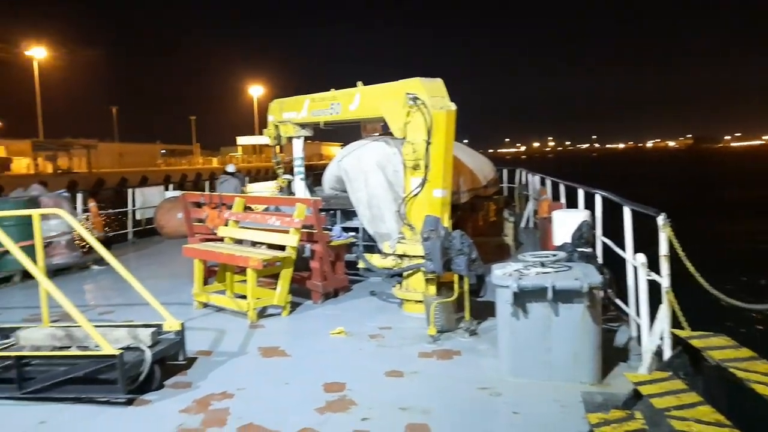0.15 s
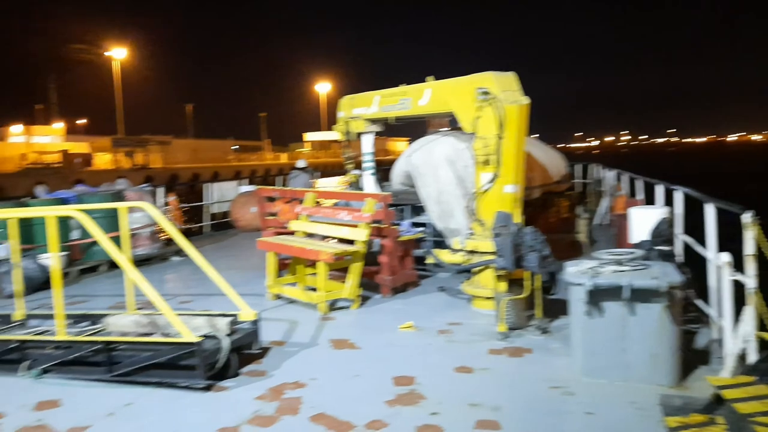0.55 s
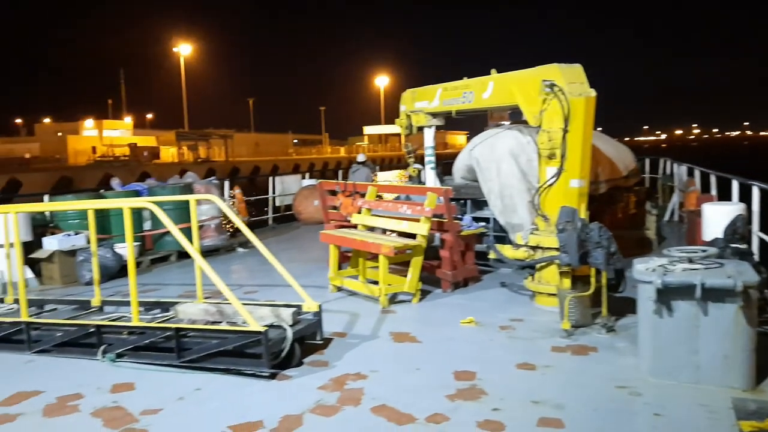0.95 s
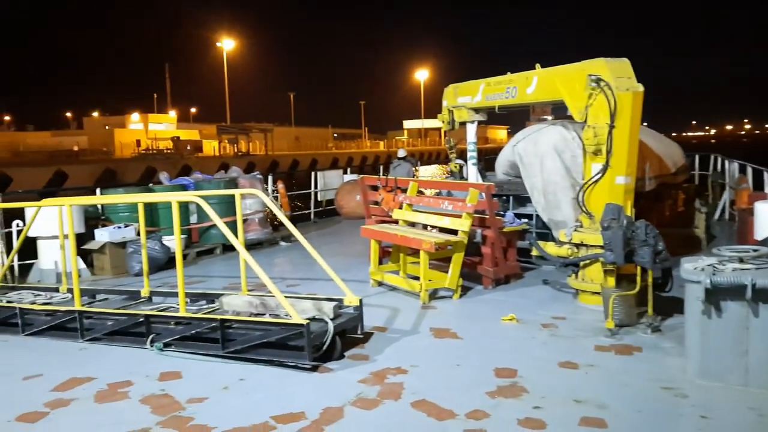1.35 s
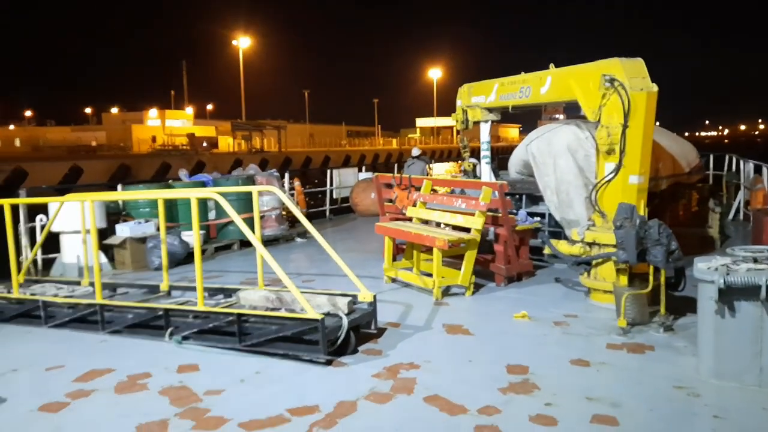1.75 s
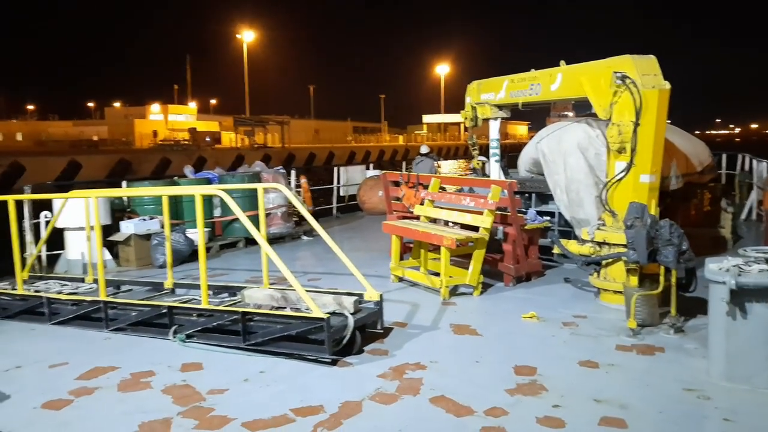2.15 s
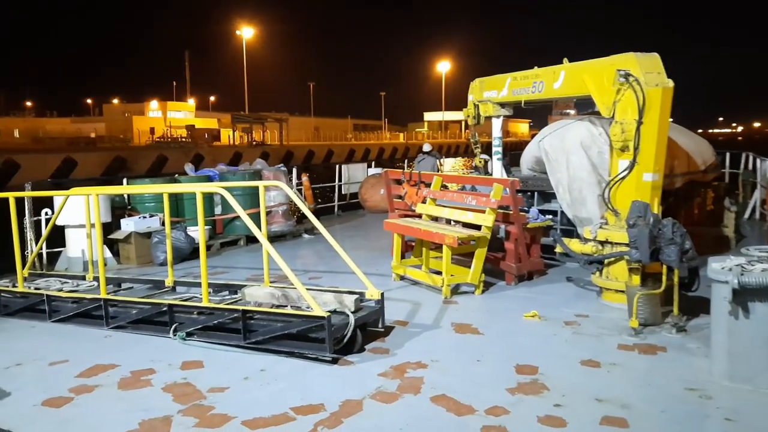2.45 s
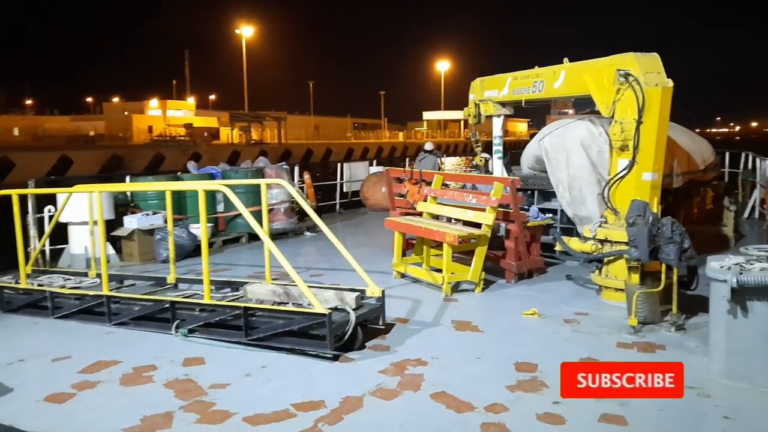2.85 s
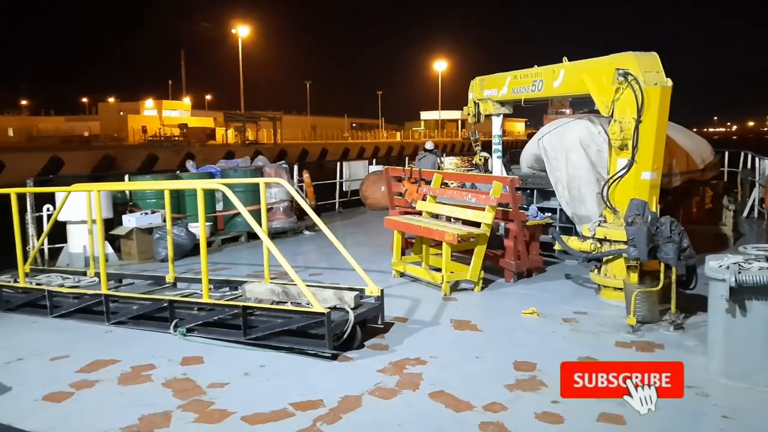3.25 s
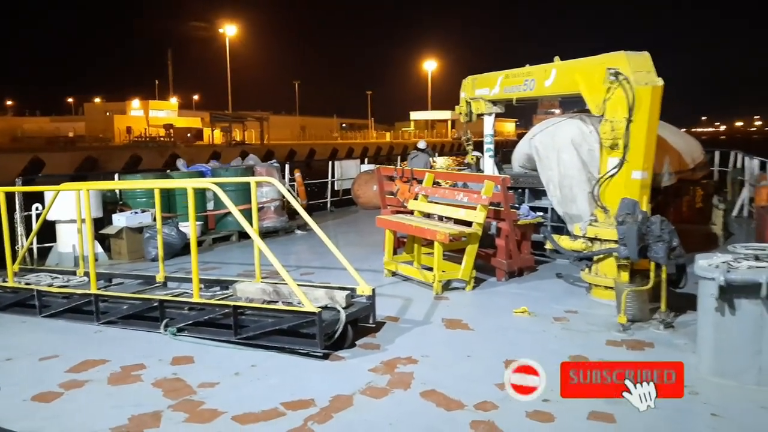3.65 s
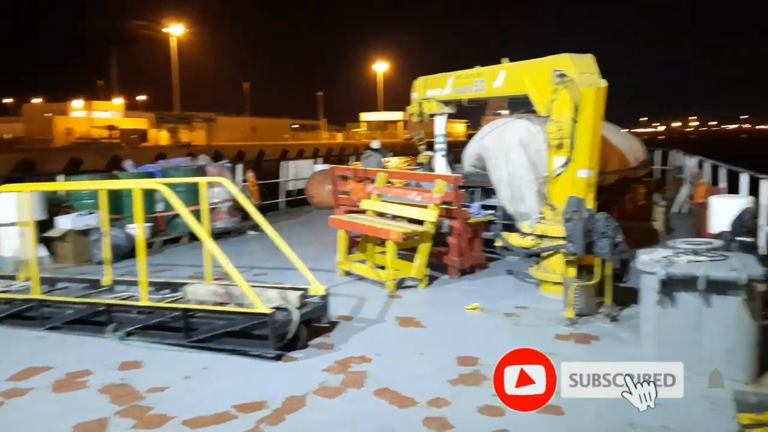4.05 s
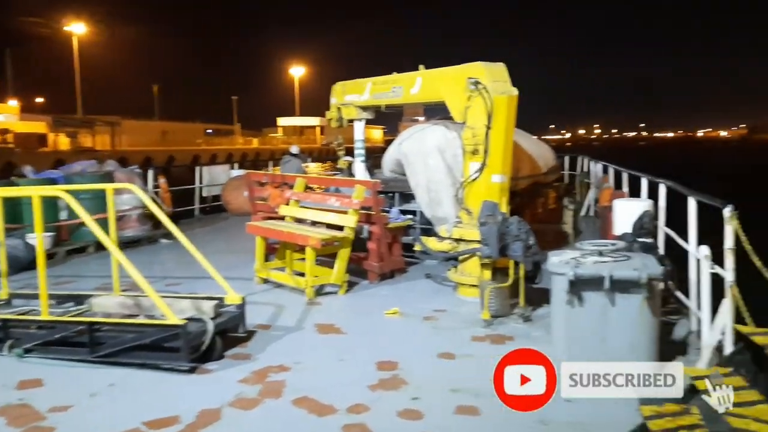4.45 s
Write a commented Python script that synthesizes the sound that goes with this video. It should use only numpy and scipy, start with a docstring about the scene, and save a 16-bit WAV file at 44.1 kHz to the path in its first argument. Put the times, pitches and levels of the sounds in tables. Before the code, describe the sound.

A dense, steady machinery drone runs from 0 to about 4.6 s on an open steel deck. Two diesels give a low throbbing hum near 90 Hz, beating about one and a half times a second, with a steady mid-low gear tone and faint clattering valve gear. A fan adds a rough, wavering low hum and weak high whine. Hull rumble, duct roar and softer louvre hiss fill the rest, with faint steel-like surges about three times a second. The first 0.13 s has extra bright hiss, which drops out abruptly. Low, short thuds fall at 0.5 s and, softer, 1.0 s; dull metal knocks come at 0.6, 1.3 and as a quick pair at 2.0 s. Loose slats flutter more from 1.3 s, easing near 4.2 s. A thin whistle swells around 2.9 s, mainly left. The stereo microphone hears centred bass and wide, diffuse treble.

```python
"""Ship's machinery under an open steel deck at night. Throughout: two diesels (beating sines, looped-noise
clatter), a six-bladed fan with motor whine (sines), and draught in hull, ducts, cowl and louvres (shaped noise).
To 0.13 s the treble is brighter; thuds at 0.5 and 1.0 s and knocks from 0.6 to 2.1 s are damped sines.
From 1.3 s loose slats flutter more strongly (noise band), easing near 4.2 s; a thin whistle swells at 2.9 s.
Two spaced ports hear the noise mostly alike in the bass, out of step in the middle, nearly unrelated on top."""
import sys
import numpy as np
from scipy import signal
from scipy.fft import rfft, irfft, next_fast_len
from scipy.io import wavfile
from scipy.ndimage import uniform_filter1d, map_coordinates

SR = 44100
rng = np.random.default_rng(int(sys.argv[2]) if len(sys.argv) > 2 else 0)


def dump(signal):
    """Clip the signal to [-1, 1] and save it as 16-bit WAV at the path in sys.argv[1]."""
    limited = np.clip(np.atleast_2d(signal).T, -1, 1)
    pcm = np.round(limited * 32767).astype(np.int16)
    wavfile.write(sys.argv[1], SR, pcm)


def gain_from_db(level_db):
    """Convert decibel levels to linear amplitude factors (20 dB per decade)."""
    decades = np.asarray(level_db, float) / 20
    return 10 ** decades


N = 203036  # samples
DIESEL_HZ, FAN_HZ = 14.8547, 29.62  # shaft turns a second


def unit(x):
    """Scaled to rms 1."""
    return x / np.sqrt(np.mean(x ** 2) + 1e-20)


def along(points, hz):
    """Each column after f/Hz, interpolated on a log axis."""
    f, *columns = np.transpose(points)
    return np.squeeze([np.interp(np.log(hz + 1), np.log(f + 1), c) for c in columns])


def curves(rows):
    """One value per sample for each column after t/s."""
    s, *columns = np.transpose(rows)
    return [np.interp(np.arange(N) / SR, s, c) for c in columns]


def wobble(knots_hz):
    """Smooth random curve."""
    knots = rng.standard_normal(int(N * knots_hz / SR) + 4)
    return map_coordinates(knots, [np.arange(N) * knots_hz / SR])


def bump(middle_s, half_s):
    """Bell-shaped swell of height 1."""
    return np.exp(-((np.arange(N) / SR - middle_s) / half_s) ** 2)


def patchy(depth_db):
    """Two unrelated noises under one field of random swells in time and pitch."""
    z = signal.stft(rng.standard_normal((2, N)), nperseg=512)[2]
    field = rng.standard_normal(z.shape[1:])
    field = uniform_filter1d(field, size=5, axis=0)
    field = uniform_filter1d(field, size=7, axis=1)
    return signal.istft(z * gain_from_db(depth_db * unit(field)), nperseg=512)[1][:, :N]


# microphone ports: f/Hz, likeness/0-1, left lead/rad, left-right/dB
PORTS = [(30, .4, 0, -.5), (90, .68, .05, -.5), (180, .75, .1, .8), (350, .73, .2, 1), (500, .78, .25, 1),
         (900, .5, .3, 1), (1250, .1, .4, 0), (1300, .1, 3, 0), (1500, .5, 3, .5), (2200, .45, 3.2, 0),
         (2400, .5, 5, -.5), (2800, .45, 5.2, .5), (3100, .15, 5, .5), (3400, .35, 4.9, 0),
         (4000, .4, 6.2, -.5), (4200, .2, 7.2, -.5), (5000, .2, 9.2, -1), (6200, .08, 12.6, -1),
         (8100, .1, 12.6, -1), (8600, .1, 12.6, -5), (10000, .15, 12.6, -3.2)]


def heard(pair, gain):
    """Colours two unrelated signals and mixes them to the ports' likeness, lag and balance; rms 1."""
    m = next_fast_len(N + 8192)
    hz = np.fft.rfftfreq(m, 1 / SR)
    alike, lead_rad, tilt_db = along(PORTS, hz)
    turn = np.arccos(np.clip(alike, 0, 1)) / 2
    shared, own = rfft(pair, m) * gain(hz) * [np.cos(turn), np.sin(turn)]
    half = gain_from_db(tilt_db / 2) * np.exp(.5j * lead_rad)
    ports = [(shared + own) * half, (shared - own) / half]
    return unit(irfft(ports, m)[:, :N])


def coloured(spectrum, depth_db):
    """Patchy noise with the relative spectral density of a table, at the ports."""
    return heard(patchy(depth_db), lambda hz: gain_from_db(along(spectrum, hz)))


BEAT_HZ, BEAT_PEAK_S = 1.517, 1.88  # a second engine fires this much lower; in step at this time


def tones(rows, base_hz, drift, waver_db, twin=0):
    """Sines on multiples of one slightly drifting shaft; each wavers in level. twin: second engine's share."""
    turns = np.cumsum(base_hz * (1 + drift * wobble(2.01))) / SR
    slip = 2 * np.pi * BEAT_HZ * (np.arange(N) / SR - BEAT_PEAK_S)  # the twin falls behind
    out = np.zeros((2, N))
    side = np.array([[.5], [-.5]])
    for multiple, db, tilt_db, lead_rad in rows:
        phase = 2 * np.pi * (multiple * turns + rng.random()) + lead_rad * side
        wave = np.sin(phase) + twin * np.sin(phase - slip)
        level_db = db + tilt_db * side + waver_db * wobble(11)
        out += np.sqrt(2) * gain_from_db(level_db) * wave
    return out


# firing tone before its throb: multiple of shaft, level/dB, left-right/dB, left lead/rad
FIRING = [(6, -33.5, -1, .1)]
# firing throb: t/s, gain/dB
THROB = [(0, -5), (.8, -9), (1.1, -0.5), (1.9, 1.5), (2.5, -4.5), (3.1, 4.5), (3.6, -5), (4.0, 4.5),
         (4.6, -2.5)]


def firing():
    """Two engines' firing tones, slightly apart, beat and throb."""
    throb = gain_from_db(curves(THROB)[0] + 2.2 * wobble(26))
    return throb * tones(FIRING, DIESEL_HZ, drift=0.002, waver_db=1.2, twin=0.7)


# valve gear: f/Hz, relative density/dB
CLATTER = [(800, -40), (1000, -5), (1400, -2), (1800, -6), (2000, 0), (2300, -3), (2600, -20), (3500, -60)]


def clatter():
    """Valve-gear noise repeated every turn makes a comb of fine lines."""
    period = SR / DIESEL_HZ  # samples
    pattern = rng.standard_normal((2, int(period) + 1))
    repeated = pattern[:, (np.arange(N) % period).astype(int)]
    return gain_from_db(-53) * heard(repeated, lambda hz: gain_from_db(along(CLATTER, hz)))


# gear tones: multiple of shaft, level/dB, left-right/dB, left lead/rad
DIESEL = [(31.5, -35, 2, .25), (42, -51, -6, .3), (45, -52, 1, .3), (47.2, -52, 0, .3), (53.6, -52, 3, .3),
          (64, -55, 5, 3), (65, -60, 5, 0), (68, -59, -4, 1.6), (72, -63, -1, 1), (80, -54.5, 3.5, .7),
          (88, -63, -5, -2), (96, -58.5, -6, -2.2), (114, -60, 3, 2.7), (130, -54, 1, 3.1),
          (132, -60.5, 2, 2.9), (137, -65, 0, 3), (143, -64, -2, -2.4)]


def diesel():
    """Firing throbs, steady gear tones and clatter, all tied to the shaft speed."""
    return firing() + tones(DIESEL, DIESEL_HZ, drift=.0001, waver_db=2.8) + clatter()


# lowest blade tone: multiple of shaft, level over swell/dB, left-right/dB, left lead/rad
BLADE = [(6, -2.5, .5, .12)]
# how strongly it reaches the deck: t/s, level/dB
BLADE_SWELL = [(0, -25), (.75, -28), (1.0, -22.5), (1.45, -26.5), (1.9, -23), (2.3, -24.5), (2.7, -34),
               (3.1, -28), (3.5, -21), (3.9, -22.5), (4.3, -23), (4.6, -27)]
# first two rows blade overtones, rest motor whine: multiple of shaft, level/dB, left-right/dB, left lead/rad
FAN = [(12, -32, 2, .6), (18, -47, 6, .5), (60, -65, -8, 1.9), (78, -64, 3, -1), (84, -66, 0, 1.8),
       (90, -68, 0, -1.6), (96, -59, 0, 2.4), (102, -57.5, 4, -.8), (108, -73, -2, -.6),
       (114, -72, 6, -2.3), (120, -75, 3, .4), (126, -75, 0, -.8)]
# motor whine: t/s, gain/dB
WHINE = [(0, -9), (.3, -0.5), (.75, -1), (.9, -3.5), (1.7, -3.5), (2, 0), (3, .5), (4.6, .5)]


def fan():
    """Blade tone, roughened by the eddies that the blades cut, its overtones and motor whine."""
    eddies_db = 2.1 * wobble(14) + 1.8 * wobble(30)
    eddies_db = eddies_db + 1.6 * np.array([wobble(7), wobble(9)])  # each port's own
    blade_gain = gain_from_db(curves(BLADE_SWELL)[0] + eddies_db)
    blade = blade_gain * tones(BLADE, FAN_HZ, drift=0.0015, waver_db=0.5)
    overtones = gain_from_db(2.5 * wobble(20)) * tones(FAN[:2], FAN_HZ, drift=0.0003, waver_db=2.5)
    whine_gain = gain_from_db(curves(WHINE)[0] + 1.1 * wobble(13))
    whine = whine_gain * tones(FAN[2:], FAN_HZ, drift=0.00033, waver_db=0.5)
    return blade + overtones + whine


# hull: f/Hz, relative density/dB
RUMBLE = [(15, -17), (28, -6.5), (45, 5), (65, 12), (140, 14), (180, 11.5), (215, 4), (280, -82.5)]
# ducts: f/Hz, relative density/dB
ROAR = [(170, -28.5), (230, -4.5), (275, -1), (305, 4), (345, -1), (420, -3), (500, -1.5), (560, -8.5),
        (620, -18), (800, -64.5)]
# t/s, rumble level/dB, roar level/dB
DRAUGHT = [(0, -24.5, -20.5), (.35, -25.5, -24), (.55, -24.5, -21), (.95, -24.5, -25), (1.2, -25.5, -22),
           (1.9, -23.5, -21.5), (2.5, -25, -22), (3.2, -22.5, -21.5), (3.7, -25.5, -21.5),
           (4.0, -23.5, -23), (4.4, -27.5, -21), (4.6, -19.5, -20.5)]


def hull_and_duct_roar(pulse_db):
    """Air shakes the hull to a low rumble and roars in the ducts."""
    rumble_db, roar_db = curves(DRAUGHT)
    rumble_gain = gain_from_db(rumble_db + 0.89 * wobble(9) + 1.3 * wobble(25.06))
    roar_gain = gain_from_db(roar_db + .3 * pulse_db + .9 * wobble(40))
    return rumble_gain * coloured(RUMBLE, depth_db=0.4) + roar_gain * coloured(ROAR, depth_db=.3)


# narrower ducts: f/Hz, relative density/dB
CHURN = [(480, -38), (580, -1.5), (700, -0.5), (800, 1), (870, -1.5), (950, -7), (1050, -10.5),
         (1350, -14.5), (1800, -83)]
# grille: f/Hz, relative density/dB
GRILLE = [(3200, -23), (3520, 10), (3680, 7), (3780, 5), (3950, -3), (4050, -58.5)]
# t/s, churn level/dB, grille level/dB
DUCTS = [(0, -31.5, -72), (.6, -33, -67), (1.1, -32.5, -69), (1.54, -32, -57.5), (2.3, -32.5, -64),
         (3, -31, -66), (3.7, -31, -58.5), (4.2, -30.5, -69.5), (4.6, -31, -57)]


def narrow_ducts_and_grille(pulse_db, lift_db):
    """Air churns in the narrower ducts; a grille gives an airy band."""
    churn_db, grille_db = curves(DUCTS)
    churn_gain = gain_from_db(churn_db + pulse_db + .3 * wobble(9) + 1.7 * wobble(60))
    grille_gain = gain_from_db(grille_db + lift_db + 1.7 * wobble(6.7))
    return churn_gain * coloured(CHURN, depth_db=1.0) + grille_gain * coloured(GRILLE, depth_db=5.5)


# resonance: f/Hz, width before squaring/Hz, relative level/dB
COWL = [(1631, 170, 5)]


def cowl(surge, pulse_db):
    """Noise through a squared resonance: steel ringing as the draught surges."""
    def ring(f):
        out = 0
        for centre_hz, width_hz, db in COWL:
            damping = 1j * f * width_hz
            out = out + gain_from_db(db) * (damping / (centre_hz * centre_hz - f * f + damping)) ** 2
        return out
    gain = surge * gain_from_db(.7 * pulse_db + 1.2 * wobble(25))
    return gain * heard(patchy(depth_db=1.0), ring)


# loose slats: f/Hz, relative density/dB
LOUVRE = [(2200, -40), (2330, -5), (2450, -3), (2560, -1), (2700, -6), (2800, -9.5), (2950, -44)]
# t/s, level/dB
SLATS = [(0, -66.5), (.4, -60), (.9, -67), (1.3, -54.5), (1.7, -56), (2.3, -57.5), (2.9, -55), (3.5, -54.5),
         (3.9, -55.5), (4.2, -65.5), (4.6, -62)]


def slats(pulse_db):
    """A fluttering noise band from loose slats."""
    gain = gain_from_db(curves(SLATS)[0] + pulse_db + 2.5 * wobble(12))
    return gain * coloured(LOUVRE, depth_db=3.5)


# draught hiss: f/Hz, relative density/dB
HISS = [(900, -12.5), (1340, -3.5), (1440, 8), (1680, 9), (1780, 3), (2250, 0), (2600, -3), (3200, -7.5),
        (3750, -10), (4500, -27), (6000, -61)]
# louvre air: f/Hz, relative density/dB
AIR = [(2500, -19.5), (4200, 3.5), (6000, 0), (8000, -7), (8800, -13), (9300, -31.5), (9700, -32),
       (10800, -26), (13000, -24), (14200, -31), (14800, -49)]
# t/s, hiss level/dB, air level/dB
FLOW = [(0, -41.5, -55), (.9, -41, -55.5), (1.6, -39.5, -55), (2.3, -40, -54), (2.8, -41, -54.5),
        (3.6, -40, -54.5), (4.6, -40, -54)]


def louvres(pulse_db, lift_db):
    """Air hisses through the louvres, a little louder in each surge."""
    hiss_db, air_db = curves(FLOW)
    hiss_gain = gain_from_db(hiss_db + lift_db + .5 * pulse_db + 0.4 * wobble(25))
    air_gain = gain_from_db(air_db + lift_db + 0.5 * wobble(15))
    return hiss_gain * coloured(HISS, depth_db=1.2) + air_gain * coloured(AIR, depth_db=1.2)


# early treble: f/Hz, relative density/dB
BRIGHT = [(2000, -2), (4000, 8), (8000, 4), (9300, -12), (10500, -9), (11200, -3), (14500, -3),
          (15300, -14)]
BRIGHT_DB, BRIGHT_FADE_DB_PER_S, BRIGHT_END_S, BRIGHT_CUT_S = -49, 24.5, 0.13, 0.0028


def early_treble():
    """Bright noise that fades slowly, then drops out smoothly but fast."""
    t = np.arange(N) / SR
    gate = (1 - np.tanh((t - BRIGHT_END_S) / BRIGHT_CUT_S)) / 2
    return gain_from_db(BRIGHT_DB - BRIGHT_FADE_DB_PER_S * t) * gate * coloured(BRIGHT, depth_db=3.0)


ONCE_DB, TWICE_DB = 1.1, 1.5  # pulse once and twice a diesel turn


def flutter():
    """Level in dB that beats with the diesel's turns, unevenly."""
    turns = np.arange(N) * DIESEL_HZ / SR + 0.043 * wobble(4.5)
    once = ONCE_DB * (1 + .4 * wobble(6)) * np.sin(2 * np.pi * turns)
    twice = TWICE_DB * (1 + .4 * wobble(6)) * np.sin(4 * np.pi * turns)
    return once + twice


# cowl surges, about three a second: t/s, level added to COWL_DB floor/dB
SURGES = [(.05, -42), (.38, -44.5), (.63, -46.5), (1.03, -49.5), (1.3, -48), (1.65, -43.5), (2.0, -45),
          (2.38, -42), (2.76, -49), (3.1, -43.5), (3.46, -47.5), (3.83, -39.5), (4.13, -42.5), (4.5, -38.5)]
SURGE_HALF_S, COWL_DB = 0.1, -51
HISS_FOLLOWS = 0.072  # dB of lift per dB of surge


def draught():
    """Moving air: one pulse and one surge curve are shared among its noises."""
    pulse_db = flutter()
    surge = gain_from_db(COWL_DB) + sum(gain_from_db(db) * bump(s, SURGE_HALF_S) for s, db in SURGES)
    lift_db = HISS_FOLLOWS * 20 * np.log10(surge / surge.mean())
    low = hull_and_duct_roar(pulse_db) + narrow_ducts_and_grille(pulse_db, lift_db)
    high = cowl(surge, pulse_db) + slats(pulse_db) + louvres(pulse_db, lift_db)
    return low + high + early_treble()


# middle t/s, half length/s, f/Hz, level/dB
WHISTLE = [(2.87, 0.19, 1442, -46)]


def whistle():
    """A thin sine, unsteady in pitch and level, swells and fades; stronger at the left port."""
    out = np.zeros(N)
    for middle_s, half_s, hz, db in WHISTLE:
        phase = 2 * np.pi * np.cumsum(hz + 4 * wobble(12)) / SR
        swell = gain_from_db(db + 1.5 * wobble(15.5)) * bump(middle_s, half_s)
        out += np.sqrt(2) * swell * np.sin(phase)
    return out * [[1], [.3]]


# t/s, starting level/dB
THUDS = [(.519, -8.5), (1.017, -12.5)]
THUD_HZ, THUD_T60_S = 108, 0.056


def thuds():
    """Each thud is a low push that rings for a few cycles."""
    s, db = np.transpose(THUDS)[:, :, None]
    t = np.clip(np.arange(N) / SR - s, 0, None)
    decay = gain_from_db(db - 60 * t / THUD_T60_S)
    return -(decay * np.sin(2 * np.pi * THUD_HZ * t)).sum(axis=0)


# dull metal: t/s, f/Hz, level before rise and decay/dB
KNOCKS = [(.615, 1635, -27.5), (1.275, 735, -24), (2.01, 778, -14), (2.07, 711, -16)]
KNOCK_T60_S, KNOCK_RISE_S = 0.054, 0.0023


def knocks():
    """Each knock rings one note, soon damped."""
    s, hz, db = np.transpose(KNOCKS)[:, :, None]
    t = np.clip(np.arange(N) / SR - s, 0, None)
    envelope = gain_from_db(db - 60 * t / KNOCK_T60_S) * (1 - np.exp(-t / KNOCK_RISE_S))
    return (envelope * np.sin(2 * np.pi * hz * t)).sum(axis=0)


def scene():
    """Everything on deck."""
    return diesel() + fan() + draught() + whistle() + thuds() + knocks()


def roll_off(x):
    """The treble ends steeply here."""
    return signal.sosfilt(signal.butter(12, 15140, fs=SR, output="sos"), x)


def record(dry):
    """The finished mix, as recorded."""
    return roll_off(dry)


dry = scene()
out = record(dry)
dump(out)
```